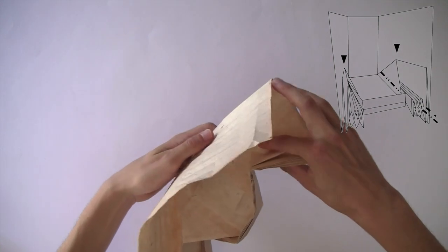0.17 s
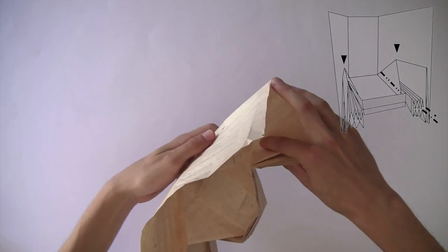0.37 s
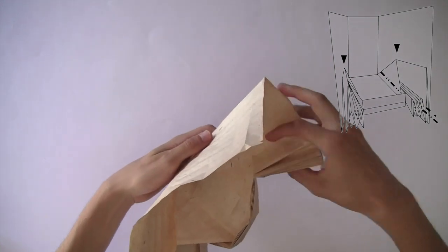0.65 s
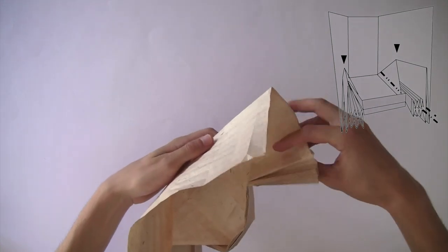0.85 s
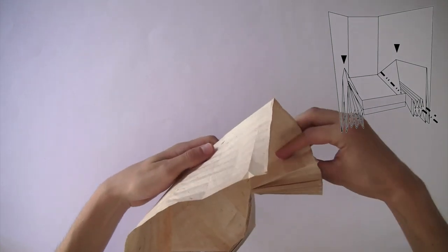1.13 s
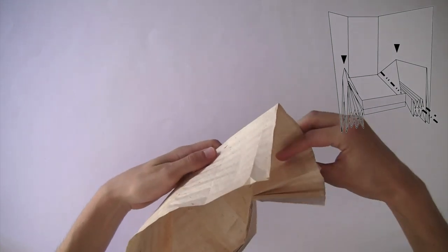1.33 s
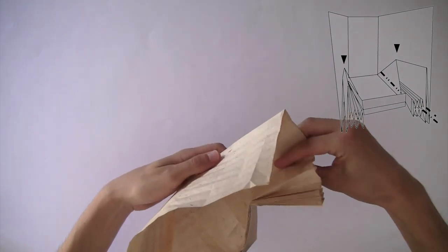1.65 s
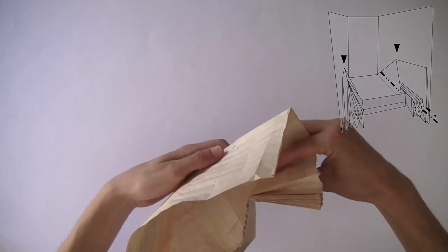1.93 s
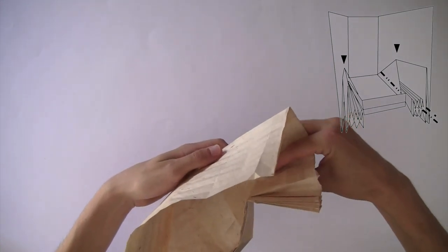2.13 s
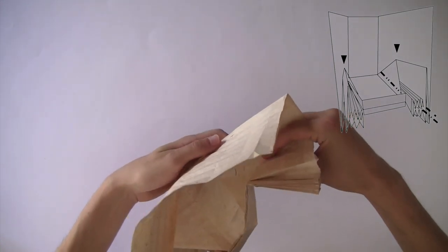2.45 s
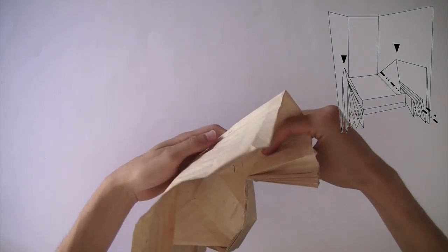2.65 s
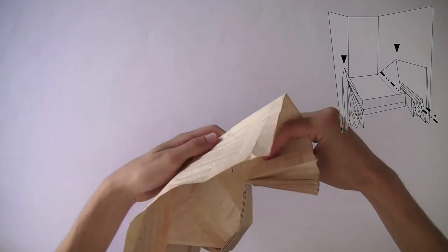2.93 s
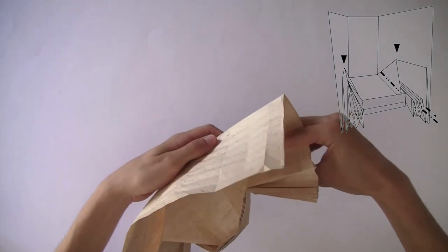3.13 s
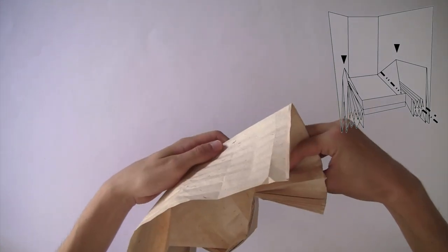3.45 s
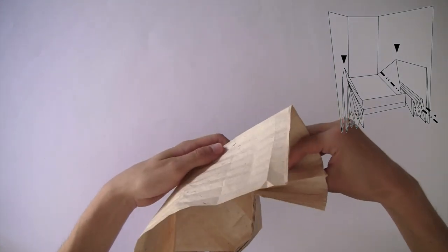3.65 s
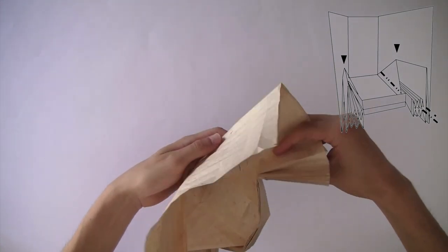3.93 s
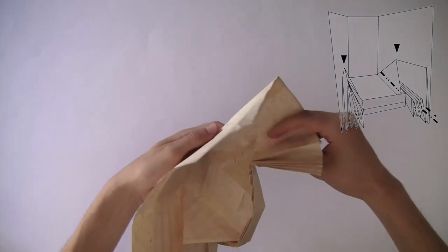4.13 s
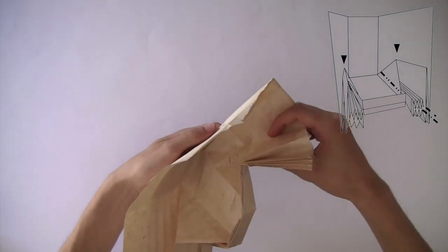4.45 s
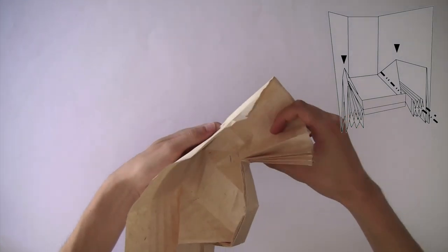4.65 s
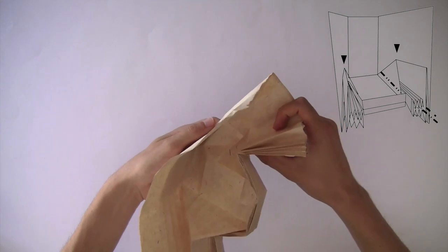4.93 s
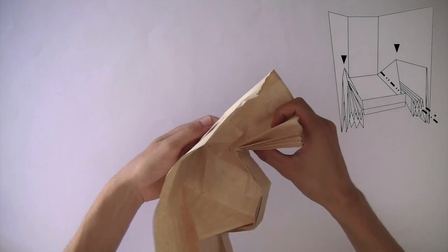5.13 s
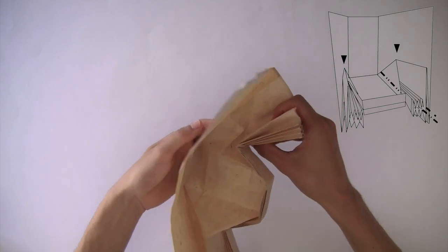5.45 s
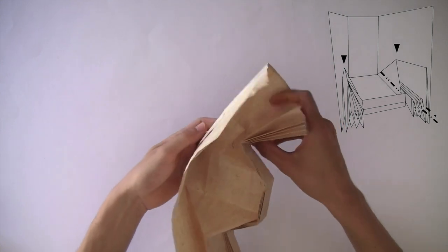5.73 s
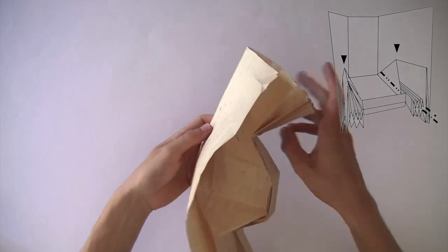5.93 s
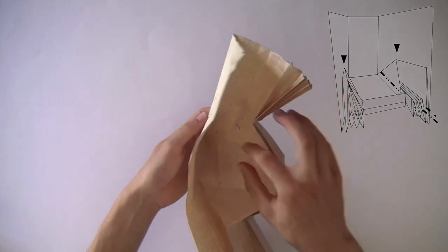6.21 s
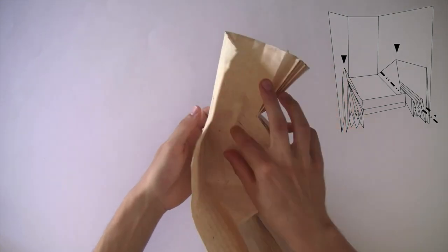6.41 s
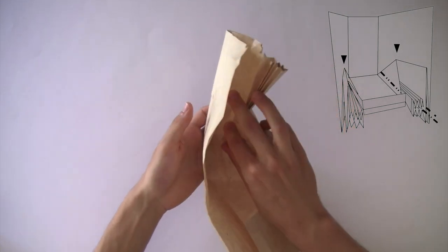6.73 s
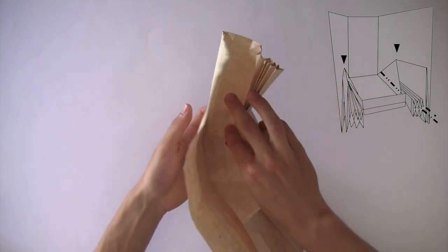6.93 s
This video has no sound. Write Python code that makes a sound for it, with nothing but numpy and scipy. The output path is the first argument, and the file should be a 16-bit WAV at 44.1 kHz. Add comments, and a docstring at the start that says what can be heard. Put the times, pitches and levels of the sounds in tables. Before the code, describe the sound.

Over a very faint steady hush, fingers brush and slide on pleated paper, making short dry scrapes, fine crackling and irregular hollow panel pops. A strong low pop comes midway, two louder snaps follow after five seconds, then a fast scratchy run of pleat-edge slaps. It ends with quiet rubbing. Close microphone, small quiet room with a short tail.

```python
"""Skin brushes stiff pleated paper over a faint steady hush; a slide rasps, then panels pop hollowly.
Two hands fold the sheet close to a microphone in a quiet room. Slides are noise from random tiny slips,
pops and crinkles are swelling, decaying sines with fibre noise, and short whistly rubs are narrow noise.
Late on, pleat edges flick past a finger in one quick run of noise slaps with a shared ring.
Near surfaces add early copies and the room a diffuse tail."""
import sys
import numpy as np
from scipy import signal
from scipy.fft import rfft, irfft, next_fast_len
from scipy.io import wavfile
from scipy.ndimage import uniform_filter1d

SR = 44100
rng = np.random.default_rng(int(sys.argv[2]) if len(sys.argv) > 2 else 0)


def dump_mix(stems):
    """Bounce the given channels to the path in sys.argv[1] as a 16-bit WAV at rate SR."""
    frames = np.atleast_2d(stems).T  # one column per channel
    limited = np.clip(frames, -1, 1)  # hard clip at full scale
    pcm = np.round(limited * 32767).astype(np.int16)
    wavfile.write(sys.argv[1], SR, pcm)


N = 311787
TIME_S = np.arange(N) / SR

# Steady hush, spectrum: [hz, relative_db]; left-right likeness: [hz, coherence_0_to_1]
HUSH_SPECTRUM = [(15, -67), (25, -45), (70, -24), (91, -13), (144, -3.5), (274, -3), (306, -4.5), (369, -3),
                 (685, -12.5), (763, -9), (1210, -15.5), (1310, -13), (1710, -20), (3740, -21),
                 (15600, -32.5)]
HUSH_LIKENESS = [(60, 0.16), (150, 0.23), (380, 0.092), (950, 0.093), (2380, 0.11), (5980, 0.24),
                 (15000, 0.035)]
HUSH_RMS_DB = -61.5

# Skin brushing the paper until the hands rest: [time_s, rub_and_hiss_db]; drumming is offset in handling()
BRUSH = [(0, -76), (1.1, -73), (2.1, -70), (2.9, -83.5), (4.1, -73.5), (5.6, -77.5), (6.1, -73),
         (7.07, -120)]
# Layers sliding: [start_s, end_s, rub_db, hiss_over_rub_db, drum_db, swell_start_to_end_db]; before layer trims
SLIDES = [(.005, 0.13, -61, 1, -57.5, -4), (0.656, .757, -55.5, 0.5, -60, 17),
          (0.785, 0.886, -61, -0.5, -59.5, 11), (0.897, 0.971, -55.5, 1.5, -55.5, -9),
          (1.079, 1.096, -64, 0, -58, -4), (1.276, 1.335, -64, 6, -55.5, -9),
          (1.347, 1.465, -59.5, 4.5, -55, -5.5), (1.786, 1.935, -56.5, 0.5, -55.5, 6),
          (2.168, 2.241, -59, .5, -60.5, -5), (2.482, 2.575, -60.5, -0.5, -66, 10),
          (2.748, 2.795, -59.5, 2, -63.5, 8.5), (3.019, 3.06, -56.5, -0.5, -57.5, -4),
          (3.08, 3.32, -69, 3, -65, -7), (3.412, 3.53, -70.5, 2.5, -69, 4),
          (3.879, 3.909, -58.5, 5, -53, 8), (3.93, 4, -62.5, -1, -62, 7),
          (4.473, 4.655, -60, 1.5, -68, -2.5), (4.764, 4.787, -58.5, -2.5, -59, 8),
          (4.817, 4.94, -64, -6, -83, -8), (5.117, 5.299, -66, -7.5, -63.5, 4),
          (5.344, 5.4, -68, -14, -65.5, 6), (5.718, 5.81, -64.5, 1.5, -60, 10),
          (6.428, 6.514, -67, 0.5, -74, 4), (6.544, 6.583, -66.5, 0.5, -68.5, 10),
          (6.779, 6.805, -62, -4, -64, -4)]
SETTLE_DB, SETTLE_FALL_DB_PER_S = -11.5, 45.5  # after a slide: level against it, and fall rate
# Friction spectra of paper grain, fibres and sheet: [hz, relative_db]
HISS_SPECTRUM = [(1800, -17), (3000, -4.5), (3400, -5.5), (4500, -4), (6000, -3), (7400, -0.5),
                 (9000, -3.5), (10500, -5.5), (13900, -13.5), (15600, -44)]
RASP_SPECTRUM = [(900, -30), (1400, -7), (2050, -2), (2500, -6.5), (3000, -9.5), (4200, -12.5),
                 (7000, -24.5)]
DRUM_SPECTRUM = [(100, -21), (250, -1), (480, 4.5), (750, 2.5), (1100, -0.5), (1600, -18.5), (3000, -67)]
# Left-right likeness of paper noise: [hz, coherence_0_to_1]
PAPER_LIKENESS = [(200, 0.93), (1000, 0.93), (2000, 0.73), (4000, 0.26), (14000, 0.99)]

# Panels buckling, some dragging a neighbour along; a quicker flip keeps more treble, a tauter panel swings longer:
# [start_s, thump_db, settled_pitch_hz, cycles_to_widest_swing, crack_db, treble_limit_hz, fibre_db];
# thump and crack before filtering, fibre before its trim
POPS = [(0.0175, -21.5, 525, .55, -42, 1200, -43.5), (.0405, -47, 590, .5, -56, 2300, -46),
        (.1536, -37.5, 458, .6, -50, 3300, -46.5), (0.2253, -25.5, 544, 0.66, -29.5, 3950, -37),
        (0.2365, -29, 376, 0.36, -50, 3600, -43.5), (0.5816, -42.5, 449, 0.53, -46, 2300, -46.5),
        (.7395, -40, 712, 1.5, -36, 2000, -53), (0.9053, -43, 890, 1.6, -36, 2710, -53),
        (1.15, -41, 420, 0.42, -44, 1300, -55), (1.296, -37, 674, 0.6, -50, 1700, -66),
        (1.3582, -31.5, 537, 0.47, -56, 2200, -35), (1.5502, -34, 1230, .65, -35, 2000, -48.5),
        (1.9704, -26.5, 650, 0.39, -28.5, 2240, -34.5), (1.9725, -27.5, 356, 0.42, -23, 1410, -60),
        (2.176, -41, 820, 0.87, -52, 2300, -56), (2.2972, -45, 334, 0.31, -57, 1700, -65),
        (2.372, -41.5, 366, 0.42, -65, 1700, -68), (2.636, -40.5, 480, 0.26, -54, 1800, -49.5),
        (2.7878, -47, 520, .7, -55, 2300, -46), (3.0498, -46, 920, .66, -52, 2300, -42),
        (3.0671, -25.5, 827, .68, -37, 1750, -46), (3.0735, -35.5, 600, 1.64, -52, 1700, -55),
        (3.266, -45, 600, .25, -44, 2400, -50), (3.2831, -18, 441, 0.54, -40, 1100, -47.5),
        (3.309, -35, 510, 0.26, -50, 1700, -52), (3.3367, -31, 460, 0.59, -44, 1700, -52),
        (3.3481, -32, 463, .8, -47, 1700, -57), (3.59, -51, 430, 0.87, -41.5, 1870, -43),
        (3.699, -46, 437, 0.87, -64, 2000, -55), (3.7965, -48, 760, .45, -64, 2300, -49.5),
        (3.8635, -48, 734, 1, -54, 2300, -48), (3.885, -39.5, 480, 0.39, -48, 2300, -45),
        (3.912, -32.5, 408, 0.9, -53, 1700, -52), (3.9881, -35, 452, 0.24, -45, 2190, -41.5),
        (4.0452, -35.5, 418, 0.27, -43.5, 2400, -41.5), (4.362, -44, 760, 0.8, -41, 2000, -72),
        (4.4211, -28, 830, 0.73, -29.5, 2700, -47.5), (4.4243, -26.5, 650, .36, -37, 2190, -60),
        (4.9394, -38.5, 530, 0.61, -50, 2100, -64), (5.03, -18.5, 498, 0.81, -20, 3060, -60),
        (5.2451, -47.5, 480, 0.75, -53, 2600, -66), (5.4302, -14.5, 935, 0.69, -19.5, 1820, -68),
        (5.4325, -25.5, 640, .64, -29, 2070, -70), (5.6639, -40.5, 543, .25, -47, 3400, -47.5),
        (5.8076, -27, 493, 1.1, -29, 2340, -50), (5.8157, -40, 496, .5, -28, 2300, -46),
        (5.855, -37, 895, 0.89, -45, 2300, -50), (6.9081, -42, 450, 0.37, -49, 1700, -63),
        (6.937, -47.5, 620, 0.41, -45.5, 1700, -57), (7.0315, -37, 1010, 0.28, -55, 1900, -58),
        (7.0608, -37, 940, .3, -55, 1900, -55)]
# Brief ring of a crease: [hz, relative_db, swell_time_s]
CREASE_MODES = [(1894, -0.5, 0.00049), (2680, -12, 0.00085), (3540, -10, 0.0011)]
# Spectrum of fibre ticks: [hz, relative_db]
TICK_SPECTRUM = [(800, -15), (2000, 12), (3600, 6.5), (5000, 5), (7500, 6), (11000, 0), (16000, -19)]
OVERTONE_RATIO, OVERTONE_DB = 2.035, -18  # a panel's second mode against its first
RUSTLE_RISE_S = 0.009
CRINKLES_PER_S, CRINKLE_OVER_RUB_DB, CRINKLE_SPREAD_DB, CRINKLE_MID_HZ = 22, 5.5, 3, 640

# Short narrow bands of rub noise: [start_s, length_s, level_db, centre_hz]; rms level before fading the ends
NARROW_RUBS = [(.076, 0.036, -59, 2000), (.555, .04, -66.5, 2060), (.66, 0.029, -57, 2460),
               (.828, 0.059, -56, 2470), (1.272, 0.029, -60, 1510), (1.78, .05, -52.5, 7070),
               (1.861, 0.066, -56.5, 7100), (3.811, 0.016, -55.5, 6470), (3.812, .021, -56.5, 1500),
               (3.876, 0.033, -53.5, 7340), (5.184, 0.039, -57, 2320), (5.363, 0.036, -66, 2620)]
NARROW_RUB_WIDTH = 0.22  # bandwidth / centre frequency

# Slap spectrum of a pleat edge: [hz, relative_db]
PLEAT_SPECTRUM = [(60, -54), (300, -14), (520, -4), (1000, 0.5), (1500, -12), (1900, 1.5), (2450, -18.5),
                  (3150, -3), (3800, -10.5), (5000, -5.5), (7500, -14), (9800, -11.5), (13800, -18),
                  (15600, -30)]
# Brief ring of a pleat edge: [hz, relative_db, swell_time_s]
PLEAT_MODES = [(3120, -3, .0006), (5000, -13, .0004)]
# Finger presses harder, then slips off: [time_s, level_db]
FLICK_PRESS = [(5.786, -48), (5.794, -43), (5.801, -33), (5.808, -28.5), (5.815, -32.5)]
FLICK_START_S, FLICK_GAP_S, FLICK_JITTER_S = 5.7868, 0.0063, 0.0001
SLAP_RISE_S = 0.0012

# Early copies from table and walls: [delay_s, level_db]
ECHOES = [(.0042, -17), (.0071, -26), (.0096, -17.5), (.0128, -19), (.0165, -25.5), (.0255, -22)]
# Microphone ports' colouring of sound from the hands: [hz, left_minus_right_db]
PORTS = [(100, 0), (400, -1.2), (1000, -2), (2200, .8), (4500, 4), (7300, 8), (9500, 2), (13000, -5)]
# Room tail, colour: [hz, relative_db]; likeness: [hz, coherence_0_to_1]; decay by 60 dB: [hz, time_s]
ROOM_SPECTRUM = [(200, 3), (650, 0), (2000, 1), (6000, 1), (15000, -1)]
ROOM_LIKENESS = [(200, 0.61), (600, 0.81), (1500, 0.14), (3000, 0.065), (14000, 0.22)]
ROOM_T60 = [(150, .36), (500, .35), (1500, .35), (5000, .36), (14000, .26)]
POP_WET_DB, RUB_WET_DB, FLICK_WET_DB = -11, -6, -2
LEFT_LEAD_S, BAND_LIMIT_HZ = 0.00002, 15700


def amp(db):
    """Decibels to gain."""
    return 10 ** (np.asarray(db) / 20)


def unit(x):
    """Scale to rms 1."""
    return x / np.sqrt(np.mean(x ** 2) + 1e-20)


def read(points, hz):
    """Interpolate a table on a log-frequency axis."""
    table_hz, value = np.transpose(points)
    return np.interp(np.log(hz + 1), np.log(table_hz + 1), value)


def add(mix, start_s, sound):
    """Mix a sound in at start_s, cut at the end of the mix."""
    first = max(round(start_s * SR), 0)
    part = mix[:, first:][:, :sound.shape[-1]]
    part += sound[..., :part.shape[1]]


def colour(pair, spectrum, likeness):
    """Give two unrelated signals one spectrum and a left-right likeness; rms 1."""
    size = pair.shape[1]
    hz = np.fft.rfftfreq(size, 1 / SR)
    a, b = rfft(pair)
    same = np.clip(read(likeness, hz), -1, 1)
    mid = a * np.sqrt(1 + same)
    side = b * np.sqrt(1 - same)
    stereo = np.array([mid + side, mid - side])
    return unit(irfft(stereo * amp(read(spectrum, hz)), size))


def swell(t_s, rise_s):
    """Rise to 1 in rise_s, then die away."""
    u = np.maximum(t_s, 0) / rise_s
    return u * np.exp(1 - u)


def ringing(t_s, modes):
    """Sum of resonant modes that swell and die away."""
    ring = np.zeros(len(t_s))
    for hz, db, rise_s in modes:
        ring += amp(db) * swell(t_s, rise_s) * np.sin(2 * np.pi * hz * t_s)
    return ring


def hush():
    """Faint steady background: stationary noise with a fixed spectrum."""
    noise = rng.standard_normal((2, next_fast_len(N)))
    return amp(HUSH_RMS_DB) * colour(noise, HUSH_SPECTRUM, HUSH_LIKENESS)[:, :N]


def handling(edge_s=0.0078, brush_drum_db=4.0):
    """Rub, hiss and drum strengths: each slide grips, swells or fades, lets go and settles."""
    force = amp(np.interp(TIME_S, *np.transpose(BRUSH))) * amp([[0], [0], [brush_drum_db]])
    for start_s, end_s, rub_db, hiss_over_rub_db, drum_db, swell_db in SLIDES:
        contact = np.clip(np.minimum(TIME_S - start_s, end_s - TIME_S) / edge_s + 0.5, 0, 1)
        progress = np.clip((TIME_S - start_s) / (end_s - start_s), 0, 1)
        after_s = np.maximum(TIME_S - end_s, 0)
        settling = (TIME_S > end_s) * amp(SETTLE_DB - SETTLE_FALL_DB_PER_S * after_s)
        stroke = contact * amp(swell_db * (progress - 0.5)) + settling
        levels = amp([[rub_db], [rub_db + hiss_over_rub_db], [drum_db]])
        force = np.sqrt(force ** 2 + (levels * stroke) ** 2)  # powers add
    return force


def friction(spectrum, slips_per_s, spread_db, patch_db=2):
    """Tiny slips of uneven size; the noise's colour varies at random in time and frequency."""
    size = next_fast_len(N)
    slip_sizes = amp(spread_db * np.minimum(rng.exponential(1, size), 4))
    slips = (rng.random(size) < slips_per_s / SR) * slip_sizes
    grains = colour(slips * rng.standard_normal((2, size)), spectrum, PAPER_LIKENESS)
    z = signal.stft(grains, nperseg=512)[2]
    patches = uniform_filter1d(rng.standard_normal(z.shape[1:]), size=6, axis=0)  # across frequency
    patches = unit(uniform_filter1d(patches, size=8, axis=1))  # across time
    return unit(signal.istft(z * amp(patch_db * patches), nperseg=512)[1][:, :N])


def slides(rubbing, hissing, drumming, hiss_trim_db=-0.5, rasp_trim_db=-1.0, judder_db=1.34):
    """Paper on paper: the grain hisses, fibres rasp, and the sheet drums like a skin."""
    grip = unit(uniform_filter1d(rng.standard_normal(N), size=200))
    judder = unit(amp(judder_db * grip))  # the grip catches and lets go
    hiss = amp(hiss_trim_db) * friction(HISS_SPECTRUM, 7000, 1.1)
    rasp = amp(rasp_trim_db) * friction(RASP_SPECTRUM, 2500, 2.3)
    drum = friction(DRUM_SPECTRUM, 1400, 1.23)
    return judder * (hissing * hiss + rubbing * rasp + drumming * drum)


def buckle(thump_db, hz, cycles, crack_db, limit_hz, fibre_db, tick_rise_s=0.00081, sag=0.33,
           sag_time_s=0.0013, rustle_db=-18, fibre_trim_db=-5, bass_cut_ratio=0.49):
    """A crease cracks, fibres tick, and the panel flips over and swings for a few cycles."""
    t_s = np.arange(2048) / SR
    # pitch sags to hz as the tension lets go
    turns = hz * (t_s + sag * sag_time_s * (1 - np.exp(-t_s / sag_time_s)))
    envelope = swell(t_s, cycles / hz)
    swing = envelope * np.sin(2 * np.pi * turns)
    overtone = envelope * np.sin(2 * np.pi * OVERTONE_RATIO * hz * t_s)
    thump = -amp(thump_db) * (swing + amp(OVERTONE_DB) * overtone)
    crack = -amp(crack_db) * ringing(t_s, CREASE_MODES)
    # the flip takes time, rounding off treble; air slips round the panel, cancelling bass
    rounded = signal.butter(6, limit_hz, fs=SR, output="sos")
    thin = signal.butter(2, bass_cut_ratio * hz, "high", fs=SR, output="sos")
    panel = signal.sosfilt(np.vstack([rounded, thin]), thump + crack)
    fibres = colour(rng.standard_normal((2, len(t_s))), TICK_SPECTRUM, PAPER_LIKENESS)
    fibres *= swell(t_s, tick_rise_s) + amp(rustle_db) * swell(t_s, RUSTLE_RISE_S)
    return panel + amp(fibre_db + fibre_trim_db) * fibres


def crinkles(rubbing, spread_octaves=0.46, count=16):
    """Small panels buckle at random, as strongly as the paper is being worked."""
    out = np.zeros((2, N))
    panels = []
    for pitch in np.linspace(-2, 2, count):
        hz = CRINKLE_MID_HZ * 2 ** (spread_octaves * pitch)
        panels.append(buckle(0, hz, cycles=0.58, crack_db=-2, limit_hz=2600, fibre_db=-3))
    for at in np.flatnonzero(rng.random(N) < CRINKLES_PER_S / SR):
        level_db = CRINKLE_OVER_RUB_DB + CRINKLE_SPREAD_DB * rng.standard_normal()
        panel = panels[rng.integers(0, count)]
        add(out, at / SR, rubbing[at] * amp(level_db) * panel)
    return out


def pops():
    """Larger panels buckle at their listed times."""
    out = np.zeros((2, N))
    for start_s, *panel in POPS:
        add(out, start_s, buckle(*panel))
    return out


def narrow_rubs():
    """Narrow bands of rub noise: short fuzzy patches of whistly or raspy hiss."""
    out = np.zeros((2, N))
    bin_hz = np.fft.rfftfreq(4096, 1 / SR)
    for start_s, length_s, db, hz in NARROW_RUBS:
        band = 1 / (1 + (2 * (bin_hz - hz) / (NARROW_RUB_WIDTH * hz)) ** 2)
        noise = irfft(rfft(rng.standard_normal(4096)) * band)
        patch = unit(noise[:int(length_s * SR)])
        add(out, start_s, amp(db) * patch * signal.windows.tukey(len(patch), 0.5))
    return out


def flicks(bass_cut_hz=260, ring_db=3, count=5):
    """Each pleat edge gives its own scratchy slap; being alike, the edges share one brief ring."""
    out = np.zeros((2, N))
    t_s = np.arange(2048) / SR
    ring = amp(ring_db) * ringing(t_s, PLEAT_MODES)
    jitter_s = FLICK_JITTER_S * rng.standard_normal(count)
    for start_s in FLICK_START_S + FLICK_GAP_S * np.arange(count) + jitter_s:
        noise = colour(rng.standard_normal((2, len(t_s))), PLEAT_SPECTRUM, PAPER_LIKENESS)
        slap = noise * swell(t_s, SLAP_RISE_S)
        press_db = np.interp(start_s, *np.transpose(FLICK_PRESS))
        add(out, start_s, amp(press_db) * (slap + ring))
    # high-pass keeps the slaps thin, without a bass thump
    return signal.sosfilt(signal.butter(2, bass_cut_hz, "high", fs=SR, output="sos"), out)


def echoes(x, dull_hz=3000):
    """Near surfaces return dull early copies."""
    out = x.copy()
    dull = signal.lfilter(*signal.butter(1, dull_hz, fs=SR), x)
    for delay_s, db in ECHOES:
        add(out, delay_s, amp(db) * dull)
    return out


def lean(pair, table):
    """Tip each frequency left or right by opposite half gains."""
    size = next_fast_len(pair.shape[1] + 2048)
    half_db = read(table, np.fft.rfftfreq(size, 1 / SR)) / 2
    return irfft(rfft(pair, size) * amp([half_db, -half_db]), size)[:, :pair.shape[1]]


def room(x, build_s=0.0037):
    """A diffuse noise tail that builds up quickly and dies band by band."""
    noise = colour(rng.standard_normal((2, SR // 2)), ROOM_SPECTRUM, ROOM_LIKENESS)
    hz, t_s, z = signal.stft(noise, SR, nperseg=256)
    decay = amp(-60 * t_s / read(ROOM_T60, hz)[:, None])
    tail = signal.istft(z * decay, SR, nperseg=256)[1]
    tail *= 1 - np.exp(-(np.arange(tail.shape[1]) / SR / build_s) ** 2)
    return signal.fftconvolve(x, tail / np.linalg.norm(tail[0]), axes=1)[:, :N]


def scene():
    """The paper's near sound and room tail, over the hush."""
    rubbing, hissing, drumming = handling()
    rub = slides(rubbing, hissing, drumming) + narrow_rubs()
    pop = pops() + crinkles(rubbing)
    flick = flicks()
    near = lean(echoes(pop + rub + flick), PORTS)
    tail = room(amp(POP_WET_DB) * pop + amp(RUB_WET_DB) * rub + amp(FLICK_WET_DB) * flick)
    return near + tail + hush()


def record(dry):
    """The left microphone port is a little nearer, so the right lags; then a band limit."""
    size = next_fast_len(N + 2048)
    lag = np.exp(-2j * np.pi * np.fft.rfftfreq(size, 1 / SR) * LEFT_LEAD_S)
    right = irfft(rfft(dry[1], size) * lag, size)[:N]
    lowpass = signal.firwin(511, BAND_LIMIT_HZ, window=("kaiser", 9), fs=SR)
    return signal.oaconvolve(np.array([dry[0], right]), lowpass[None], "same")


dry = scene()
out = record(dry)
dump_mix(out)
```